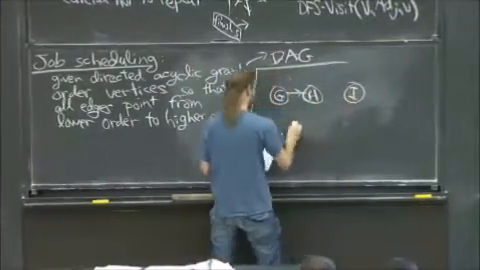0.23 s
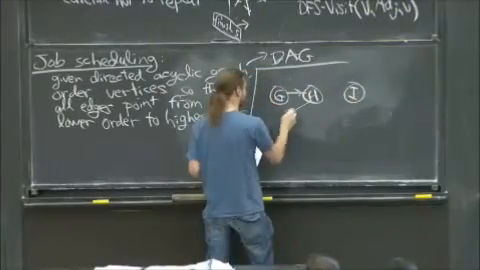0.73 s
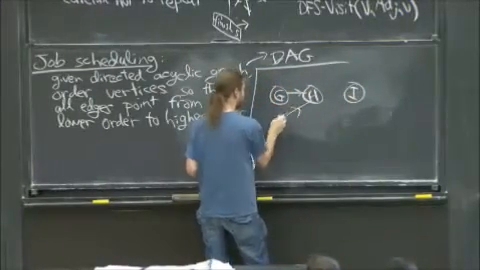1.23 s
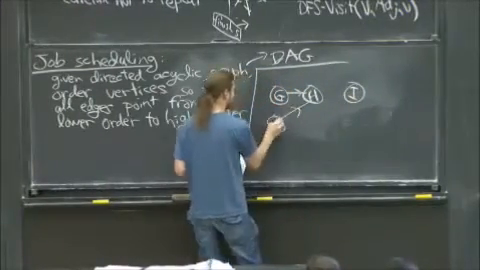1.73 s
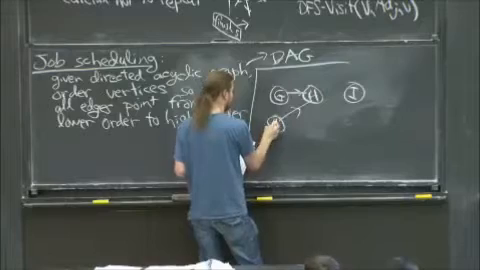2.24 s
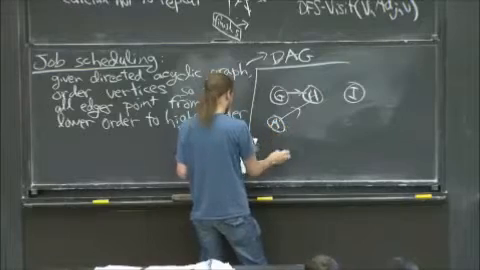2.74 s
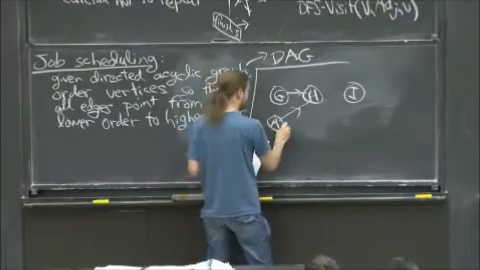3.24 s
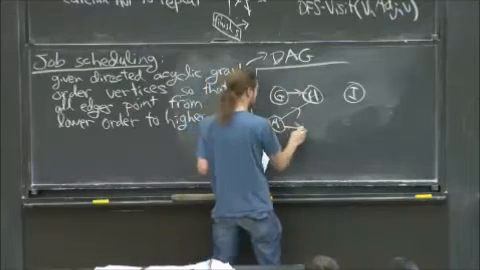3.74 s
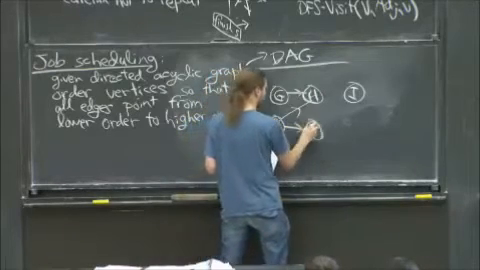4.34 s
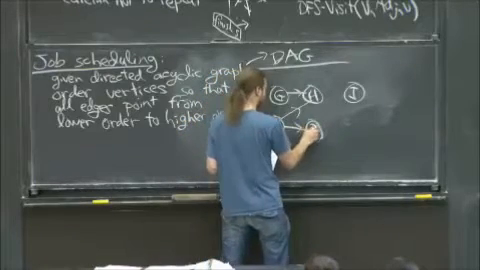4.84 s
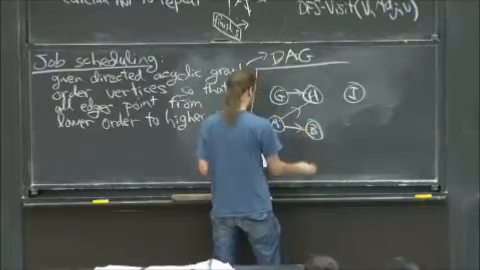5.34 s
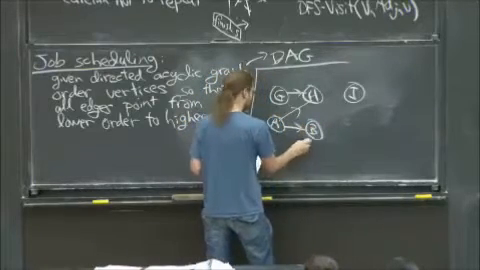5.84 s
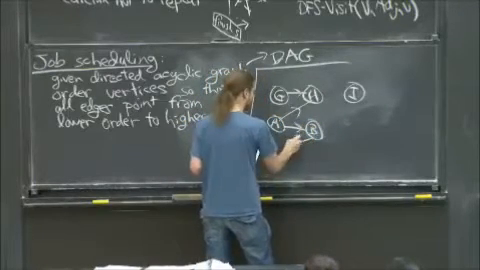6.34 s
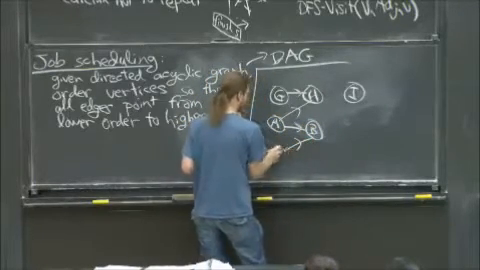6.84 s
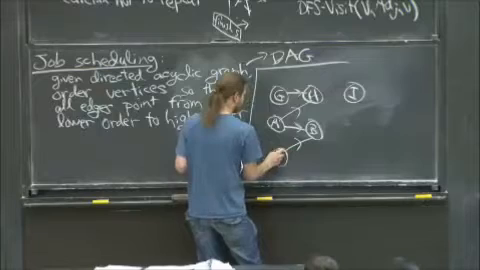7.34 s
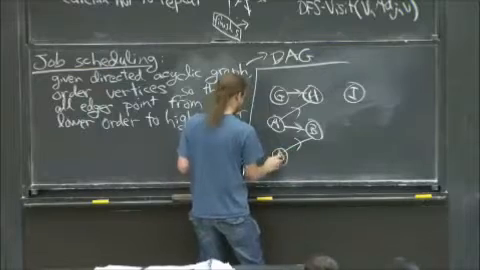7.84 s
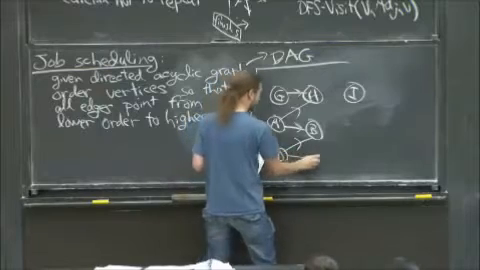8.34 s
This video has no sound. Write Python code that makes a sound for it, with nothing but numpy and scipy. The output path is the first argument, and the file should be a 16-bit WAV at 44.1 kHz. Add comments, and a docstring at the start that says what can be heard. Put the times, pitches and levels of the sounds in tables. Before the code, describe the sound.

Chalk knocks dully on a large blackboard in irregular taps, each followed by a faint hissing, squeaky slide, over low ventilation rumble in an echoing hall.

```python
"""Chalk writes and draws on a large blackboard in a lecture hall.
Most strokes open with a dull knock: a short blow that rings the panel, echoes from its frame and fills the hall.
Then the stick slides with a faint hiss and squeak: noise from tiny slips, shaped by resonances.
Ventilation rumbles underneath: steady coloured noise with a low drone."""
import sys
import numpy as np
from scipy import signal
from scipy.fft import rfft, irfft
from scipy.io import wavfile

SR = 44100
rng = np.random.default_rng(int(sys.argv[2]) if len(sys.argv) > 2 else 0)


def to_wav(s):
    """Save 16-bit WAV."""
    ch = np.atleast_2d(s).T  # columns
    pcm = np.round(np.clip(ch, -1, 1) * 32767)  # PCM
    wavfile.write(sys.argv[1], SR, pcm.astype(np.int16))


N = 378378
# length of the response to one blow (samples), and its frequencies (Hz)
SIZE = 65536
HZ = np.fft.rfftfreq(SIZE, 1 / SR)


def amp(db):
    """Turns decibels into a gain."""
    return 10 ** (np.asarray(db) / 20)


def evened(x):
    """Scales a sound to an average (rms) level of 1."""
    return x / np.sqrt(np.mean(x ** 2) + 1e-20)


def read(table, hz, order=1):
    """Reads one column of a table, joined by straight lines over log frequency."""
    columns = np.transpose(table)
    return np.interp(np.log(hz + 1), np.log(columns[0] + 1), columns[order])


def bell(hz, centre, width):
    """Resonance curve: 1 at its centre, one half at half the width to either side."""
    return 1 / (1 + (2 * (hz - centre) / width) ** 2)


def add(mix, s, sound):
    """Mixes a sound in at time s (seconds), which may lie before zero."""
    start = round(s * SR)
    sound = sound[max(-start, 0):]
    part = mix[max(start, 0):][:len(sound)]
    part += sound[:len(part)]


def causal(db):
    """Minimum-phase response with the given gains: it rings only after the blow."""
    mirrored = np.r_[db, db[-2:0:-1]]
    log_gain = np.log(amp(mirrored))
    return np.exp(np.conj(signal.hilbert(log_gain)))[:len(db)]


def coloured(x, gain):
    """Filters x by gain(Hz), then scales it to rms 1."""
    hz = np.fft.rfftfreq(len(x), 1 / SR)
    return evened(irfft(rfft(x) * gain(hz), len(x)))


def waver(rate_hz):
    """Random up-and-down drift of rms 1; a higher rate drifts faster."""
    return coloured(rng.standard_normal(N), lambda hz: bell(hz, 0, 2 * rate_hz) ** 2)


def delay(s):
    """Response of a plain delay of s seconds."""
    return np.exp(-2j * np.pi * HZ * s)


def tail(table, rise_s):
    """Response of dense reflections that build up, then die at each band's own speed."""
    hz, t, z = signal.stft(rng.standard_normal(SIZE), SR, nperseg=512, noverlap=448)
    t60 = read(table, hz, order=2)[:, None]
    z = z * amp(-60 * t / t60)
    z /= np.linalg.norm(z, axis=1, keepdims=True)
    x = signal.istft(z, nperseg=512, noverlap=448)[1][:SIZE]
    x *= 1 - np.exp(-np.arange(SIZE) / SR / rise_s)
    return rfft(x / np.linalg.norm(x)) * amp(read(table, HZ))


def air(drone_hz=55, drone_width_hz=10, drone_db=-70, wash_db=-61.5, swell_db=0.3):
    """Steady ventilation and microphone hiss as coloured noise, with a low duct resonance."""
    # colour of the noise; the overall level is wash_db: hz, level_db (per Hz, relative)
    air_colour = [(12, -42), (20, -19.5), (42, -1), (59, -4), (71, -3.5), (86, -13), (123, -10.5),
                  (175, -14), (242, -16), (309, -22), (642, -25.5), (1610, -29), (2770, -34.5), (5000, -43),
                  (8660, -47.5), (11800, -50), (12500, -61)]
    wash = coloured(rng.standard_normal(N), lambda hz: amp(read(air_colour, hz)))
    wash *= amp(swell_db * waver(12))
    drone = coloured(rng.standard_normal(N), lambda hz: bell(hz, drone_hz, drone_width_hz))
    return amp(wash_db) * wash + amp(drone_db) * drone


def whistle(slips, centre_hz, width_hz, wander_hz):
    """A resonance whose pitch wanders as the grip, angle and place of the chalk change."""
    band = signal.hilbert(coloured(slips, lambda hz: bell(hz, centre_hz, width_hz)))
    shift_hz = wander_hz * waver(4.7)
    return (band * np.exp(2j * np.pi * np.cumsum(shift_hz) / SR)).real


def strokes(grain_db=3, uneven_db=1.5, ramp_s=0.045, lift_s=0.073, press_db=3, arch_db=2.0,
            catches_per_s=40, catch_db=13):
    """Tiny slips of the chalk excite the stick's two resonances and the panel under it."""
    # one row a stretch of sliding chalk; a long stroke may take several rows;
    # a slanted stick squeaks more and fizzes less: start_s, end_s, pressure_db, slant_db
    stretches = [(0.158, 0.24, 3.5, 1), (0.37, 0.438, 4, 2), (1.292, 1.45, 7.5, 0.5), (1.633, 1.81, -3, -3),
                 (2.028, 2.304, -0.5, -4.5), (2.295, 2.432, 3.5, -1), (2.62, 2.828, -6, -3),
                 (2.86, 2.986, -3, 1), (3.12, 3.233, -2, -2), (4.042, 4.177, 1.5, -3), (4.33, 4.5, -1, -4),
                 (4.73, 4.897, -0.5, 0), (4.92, 5.048, 3, -3), (5.176, 5.31, -2, -1),
                 (5.407, 5.578, -3.5, -2), (5.6, 5.7, -2, -3), (5.72, 5.836, -2, -3),
                 (6.8, 6.958, 4.5, -0.5), (7.122, 7.306, -3.5, -1), (7.6, 7.757, -1.5, -3),
                 (7.737, 7.904, 0, 6), (7.915, 8.02, 0.5, 0), (8.143, 8.267, -1, 2), (8.387, 8.58, -3.5, 1)]
    # the panel under sliding chalk: hz, level_db (relative)
    rub_colour = [(60, -22), (200, 4.5), (500, -3), (700, 2), (810, 1.5), (950, -7.5), (1220, -3),
                  (1500, -11), (2100, -24), (3400, -16), (4800, -24.5), (9000, -29), (13000, -41.5)]
    # resonances of the chalk stick, and the panel's main ring: centre and width (Hz)
    squeak_band, fizz_band, ring_band = (5490, 570), (11660, 1900), (795, 67)
    # levels at normal pressure and slant, before the shape of the stretch (dB)
    fizz_db, squeak_db, rub_db, ring_db = -84.5, -86, -65, -69.5
    # how much squeak and rub follow the pressure (dB per dB)
    squeak_growth, rub_growth = 0.6, 0.78

    t = np.arange(N) / SR
    fizz, squeak, rub, ring = np.zeros((4, N))
    for start, end, pressure, slant in stretches:
        # the touch is at half its height at the start and end times
        touch = np.clip(np.minimum((t - start) / ramp_s, (end - t) / lift_s) + 0.5, 0, 1)
        # the hand leans in along the stretch and moves fastest in its middle
        along = np.clip((t - start) / (end - start), 0, 1)
        lean_db = press_db * (along - 0.5)
        speed_db = arch_db * (np.sin(np.pi * along) - 1)
        touch *= amp(lean_db + speed_db)
        fizz += touch * amp(fizz_db + pressure - slant)
        squeak += touch * amp(squeak_db + squeak_growth * pressure + slant)
        rub += touch * amp(rub_db + rub_growth * pressure)
        ring += touch * amp(ring_db + pressure)

    roughness_db = grain_db * waver(300) + uneven_db * waver(23)
    slips = evened(rng.standard_normal(N) * amp(roughness_db))
    # now and then the tip catches on a harder grain
    sizes = rng.uniform(-1, 1, N)
    catches = amp(catch_db) * sizes * (rng.random(N) < catches_per_s / SR)
    stick = fizz * whistle(slips, *fizz_band, wander_hz=293)
    stick += squeak * whistle(slips, *squeak_band, wander_hz=92)
    panel = rub * coloured(slips + catches, lambda hz: amp(read(rub_colour, hz)))
    panel += ring * whistle(slips, *ring_band, wander_hz=35.5)
    return stick + panel


def slow_modes():
    """Response of the whole panel's lingering modes: fading tones."""
    # t60 is the time to fade by 60 dB: hz, level_db (against the direct blow), t60_s
    mode_table = [(146.8, -46.5, 0.45), (176.9, -56.5, 0.36), (340, -64.5, 0.47), (426, -58.5, 0.16),
                  (578, -51, 0.18), (682, -67.5, 0.13)]
    t = np.arange(SIZE) / SR
    total = np.zeros(SIZE)
    for hz, db, t60 in mode_table:
        fade = np.exp(-np.log(1000) * t / t60)
        total += amp(db) * fade * np.cos(2 * np.pi * hz * t)
    return rfft(total)


def crumble(db=-1, fade_s=0.0065, above_hz=1700):
    """Chalk tip crushing in the first milliseconds of a blow: fading noise with its bass removed."""
    t = np.arange(SIZE) / SR
    grit = rng.standard_normal(SIZE) * np.exp(-t / fade_s)
    high_pass = 1j * HZ / (above_hz + 1j * HZ)
    return amp(db) * rfft(grit / np.linalg.norm(grit)) * high_pass


def panel_colour(force, hardness, bass, crack, bass_below_hz=160, bass_gone_hz=420):
    """Spectrum of one blow in dB: a hard contact lifts the treble, a yielding spot the bass."""
    # a knock on the panel: hz, level_db (relative)
    panel_table = [(30, -5.5), (90, -1), (150, 6), (230, 12), (330, 14.5), (480, 14.5), (720, 19.5),
                   (860, 11.5), (1020, 3), (1400, -6), (2100, -14.5), (2700, -22.5), (4000, -22),
                   (7000, -35), (10000, -40)]
    # a harder contact is shorter and so brighter: hz, lift (dB per dB of hardness)
    hardness_table = [(420, 0), (800, 0.3648), (1300, 1.0644), (3000, 1.26), (8000, 1.08)]
    # the crack of the tip lies in the treble: hz, share (0 to 1)
    crack_table = [(2200, 0.23), (4500, 1)]
    # higher resonances that every knock excites: hz, width_hz, lift_db
    clack_table = [(1670, 310, 0.5), (2650, 450, 7), (3680, 470, 3.5), (11600, 2400, 8)]
    contact = hardness * read(hardness_table, HZ) + crack * read(crack_table, HZ)
    spot = read([(bass_below_hz, bass), (bass_gone_hz, 0)], HZ)
    clack = sum(db * bell(HZ, hz, width) for hz, width, db in clack_table)
    return force + read(panel_table, HZ) + contact + spot + clack


def knocks(ring_q=7, echo_share=0.88, echo_top_hz=2500, wall_top_hz=3500, hall_ring_share=0.32, level_db=-6):
    """Each blow spreads through the panel, comes back from the frame, scatters, and fills the hall."""
    # one row a touch of the chalk; the spot that is hit sets the frame echo and the main ring:
    # time_s, force_db, hardness_db, bass_db, crack_db (of the tip), frame_echo_s, ring_hz
    touches = [(-0.17, 4.5, 2.5, 5.5, 1, 0.0031, 750), (0.161, 4, 1.5, 3, -6.5, 0.0038, 940),
               (0.3599, -8.5, -2, 12, 7.5, 0.0027, 643), (1.2667, 1, -1, 2.5, 0.5, 0.0026, 1053),
               (1.6141, 3.5, 2, 4.5, -3.5, 0.003, 722), (1.9997, -2, -2.5, 3, 0, 0.0032, 710),
               (2.5976, 1, 7.5, 4.5, -.5, .0032, 745), (3.1098, -1, 8, 7, -3.5, .0036, 795),
               (4.0265, -1.5, 9.5, 3, -2, 0.0035, 828), (4.3337, -6.5, 4.5, 5.5, -7.5, .0033, 723),
               (4.6845, 1.5, -1, 3.5, 0, 0.0027, 782), (5.1707, -5, 7, 6, -7, 0.00295, 807),
               (5.412, -7, 0, 4.5, -6, .00291, 766), (5.478, -38, 14, 3, 8, 0.0039, 788),
               (6.7638, -5.5, -2, 7, 0.5, 0.0025, 688), (7.0952, -2.5, 0, 4, 5.5, 0.003, 660),
               (7.5367, -4.5, -4, -8, 1.5, .0024, 740), (8.1335, -4, 7.5, -0.5, 7, .00385, 784),
               (8.3805, -5, 4.5, -7, -3.5, 0.0031, 890)]
    # side rings of the panel, the same at every spot: hz, lift_db
    side_rings = [(365, 1), (530, 1.5)]
    # the upper ring rises as the hand moves down towards the frame: time_s, ring_hz
    upper_ring_path = [(5.5, 1192), (6.7, 1496)]
    # single reflections from floor and walls: delay_s, level_db
    wall_echoes = [(0.0167, -22), (.028, -26.5), (0.053, -31.5)]
    # bending waves scattered about the panel: hz, level_db (against the direct blow), t60_s
    scatter_table = [(100, 4.5, 0.098), (300, 1, 0.14), (650, 3.5, 0.09), (1350, -4.5, 0.07),
                     (3000, -7.5, 0.12), (8000, -15, 0.073)]
    # reverberation of the hall: hz, level_db (against the direct blow), t60_s
    hall_table = [(100, -3, 1.5), (300, -12.5, 0.92), (685, -13, 0.88), (1380, -10.5, 1.2),
                  (3000, -21.5, 0.22), (8000, -14, 0.25)]
    # lift at ordinary hardness (dB), and its growth (dB per dB of hardness)
    main_ring_db, upper_ring_db, ring_growth = 4.5, 6.5, 0.31
    # a stiffer spot rings higher and more clearly: a middling ring, and the extra lift above it
    middle_ring_hz, ring_db_per_octave = 735, 13

    out, modes = np.zeros(N), slow_modes()
    walls = sum(amp(db) * delay(s) for s, db in wall_echoes) / (1 + 1j * HZ / wall_top_hz)
    for s, force, hardness, bass, crack, echo_s, ring_hz in touches:
        colour = panel_colour(force, hardness, bass, crack)
        # a harder blow brings out the spot's two rings
        harder_db = ring_growth * hardness
        stiffer_db = ring_db_per_octave * np.log2(ring_hz / middle_ring_hz)
        main_ring = (ring_hz, main_ring_db + harder_db + stiffer_db)
        upper_ring = (np.interp(s, *np.transpose(upper_ring_path)), upper_ring_db + harder_db)
        all_rings = [*side_rings, main_ring, upper_ring]
        rings = sum(db * bell(HZ, hz, hz / ring_q) for hz, db in all_rings)
        # the frame returns the wave upside down and duller
        frame = -echo_share * bell(HZ, 0, 2 * echo_top_hz) * delay(echo_s)
        scatter = tail(scatter_table, rise_s=0.00062) * delay(0.001945)
        near = causal(colour + rings) * (1 + crumble() + frame + modes + scatter)
        # the hall gathers sound from the whole panel, so single resonances stand out less
        hall = causal(colour + hall_ring_share * rings)
        hall = hall * tail(hall_table, rise_s=0.0097) * delay(0.018)
        add(out, s, irfft(near * (1 + walls) + hall))
    return amp(level_db) * out


def scene():
    """Chalk and room summed at one microphone."""
    return (knocks() + strokes() + air())[None]


def record(dry, edge_hz=13050):
    """The recorder's band limit: a low-pass filter removes the highest treble."""
    low_pass = signal.firwin(255, edge_hz, window=("kaiser", 7), fs=SR)
    return signal.oaconvolve(dry, low_pass[None], "same")


dry = scene()
out = record(dry)
to_wav(out)
```